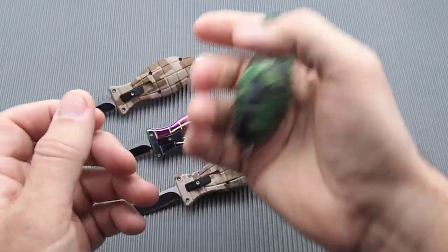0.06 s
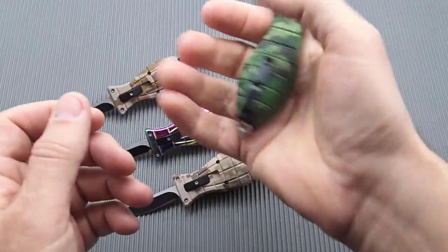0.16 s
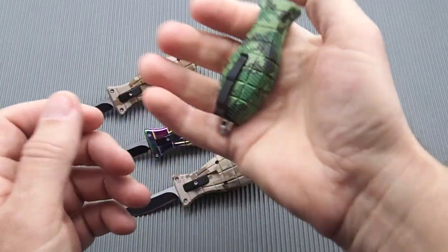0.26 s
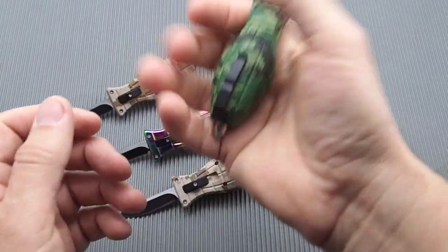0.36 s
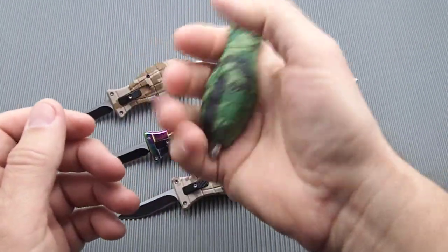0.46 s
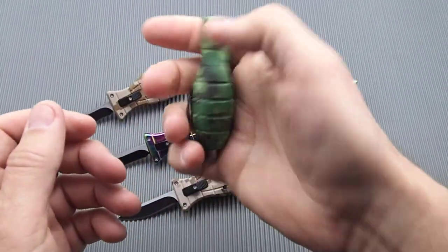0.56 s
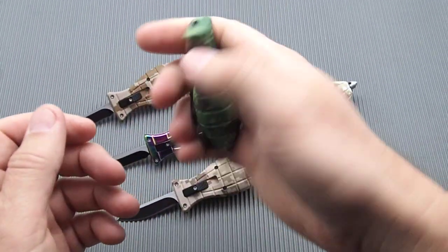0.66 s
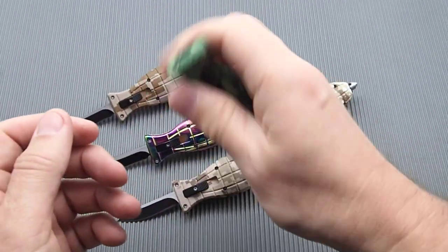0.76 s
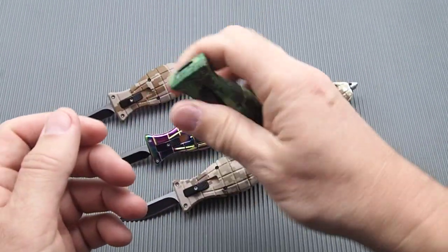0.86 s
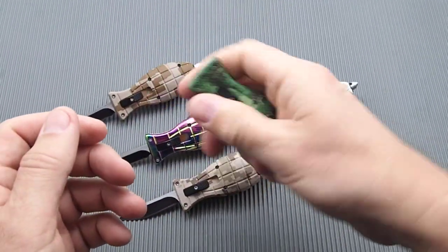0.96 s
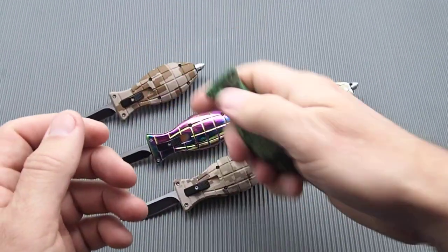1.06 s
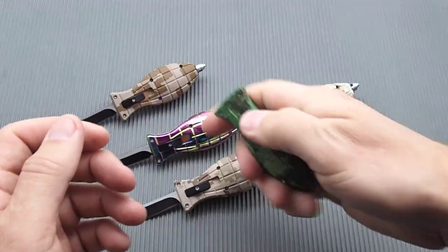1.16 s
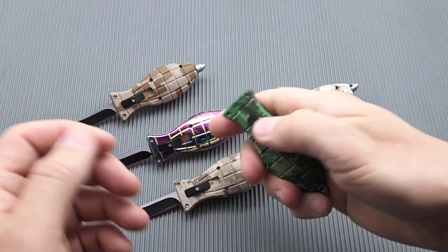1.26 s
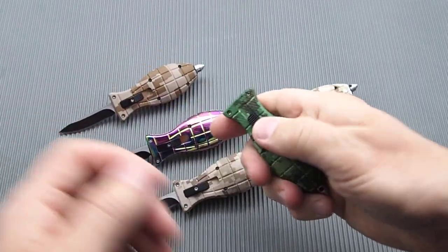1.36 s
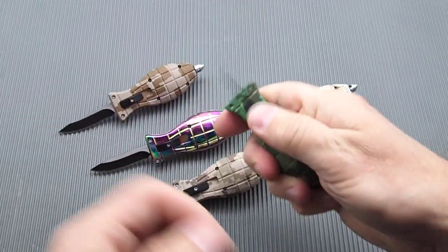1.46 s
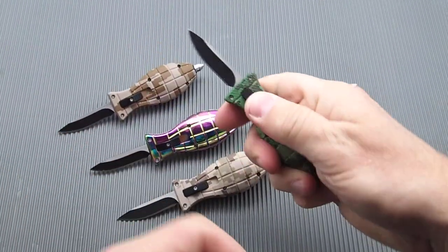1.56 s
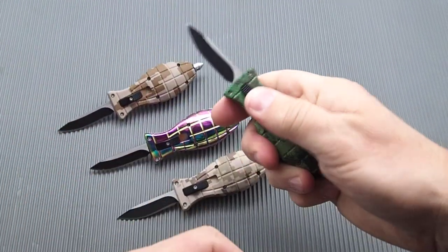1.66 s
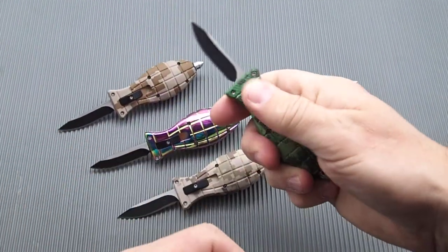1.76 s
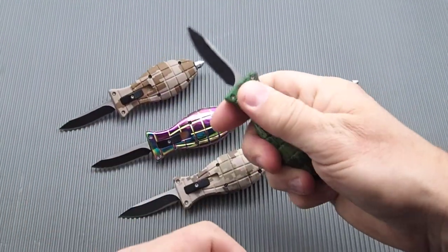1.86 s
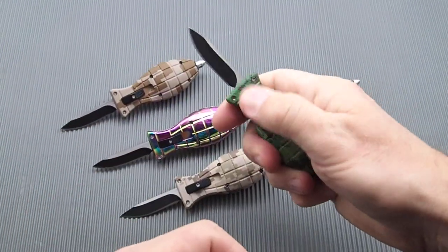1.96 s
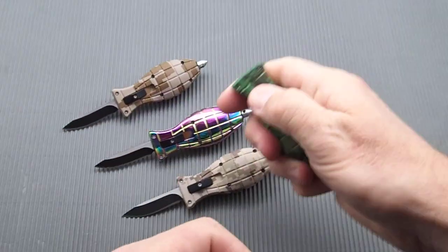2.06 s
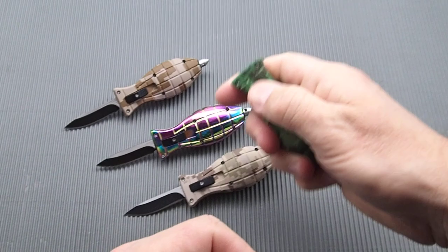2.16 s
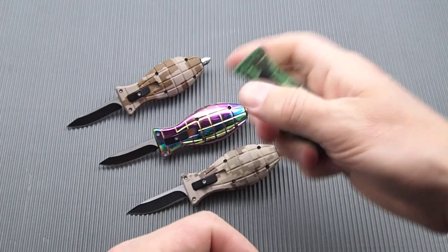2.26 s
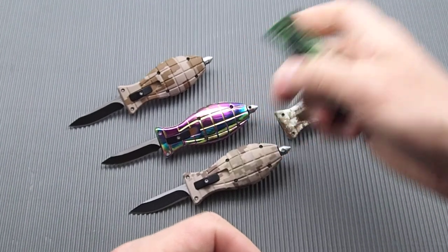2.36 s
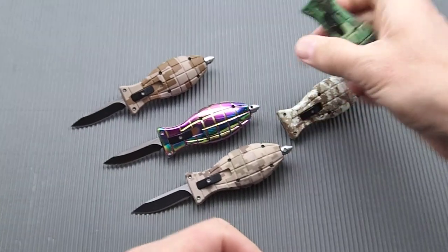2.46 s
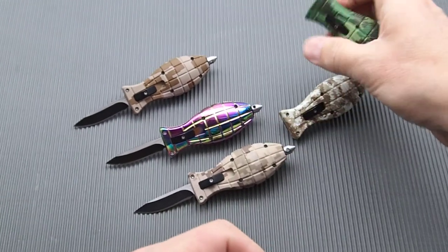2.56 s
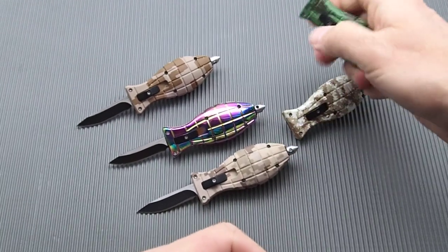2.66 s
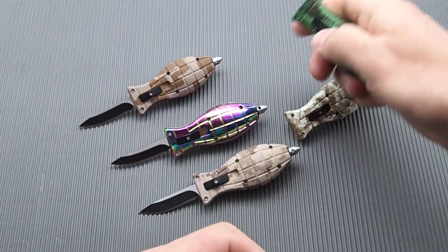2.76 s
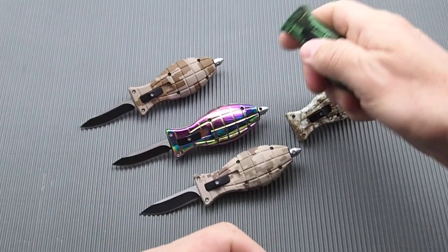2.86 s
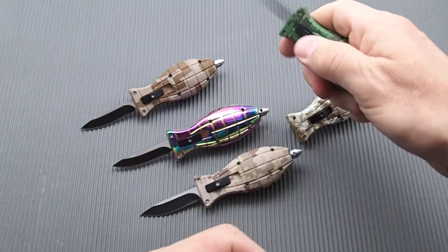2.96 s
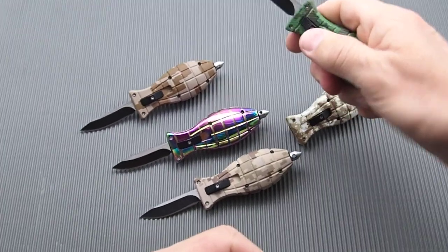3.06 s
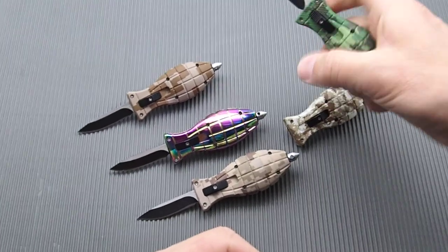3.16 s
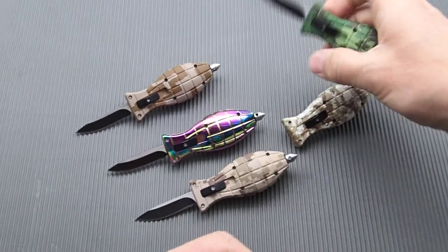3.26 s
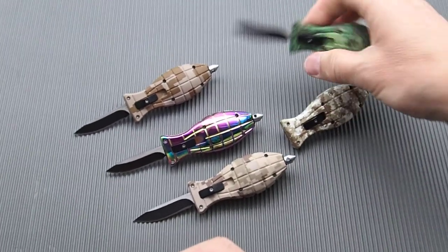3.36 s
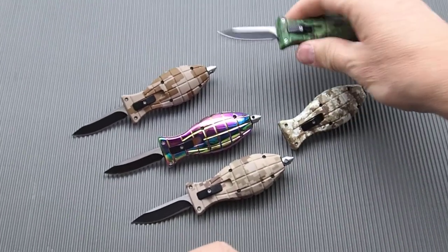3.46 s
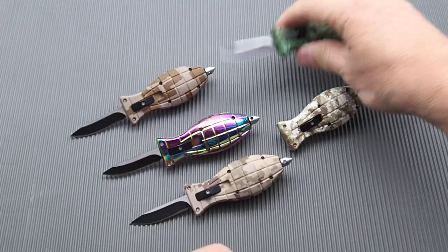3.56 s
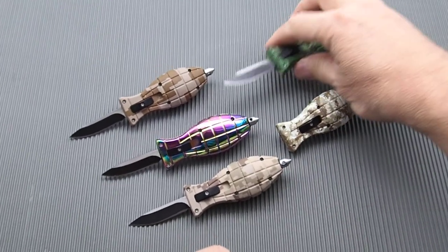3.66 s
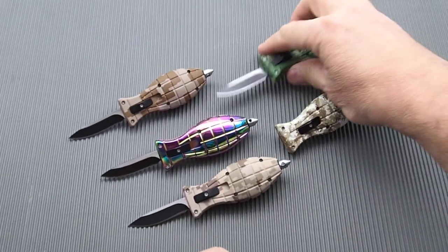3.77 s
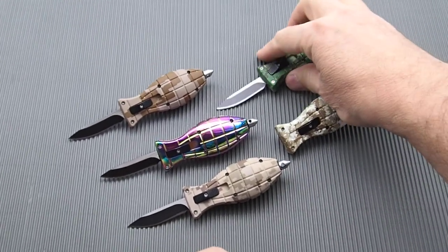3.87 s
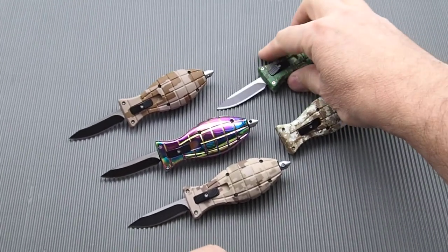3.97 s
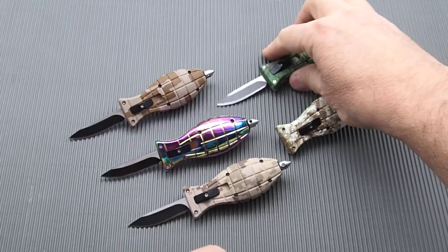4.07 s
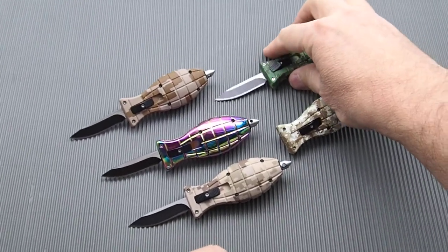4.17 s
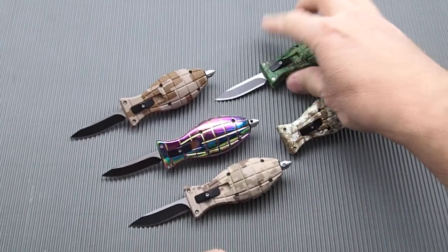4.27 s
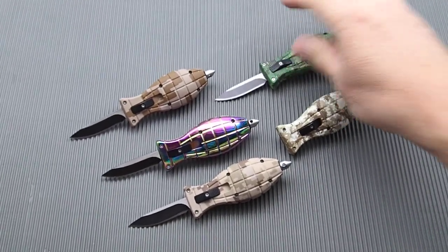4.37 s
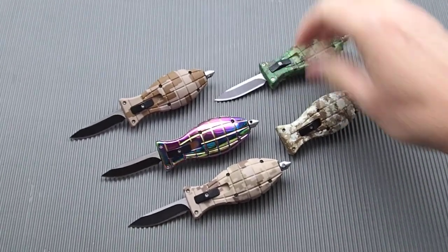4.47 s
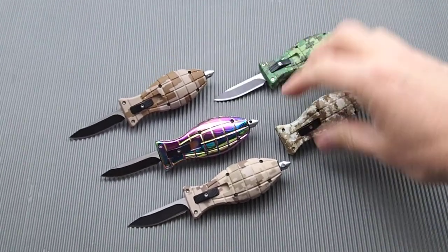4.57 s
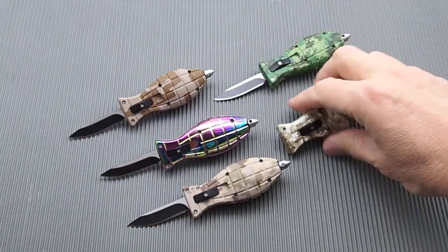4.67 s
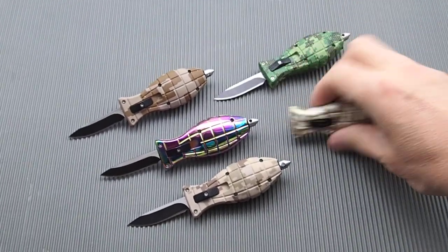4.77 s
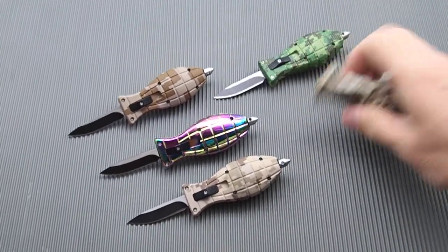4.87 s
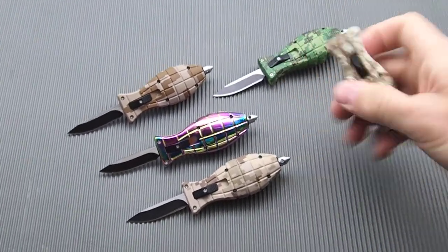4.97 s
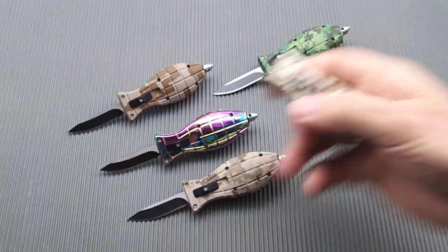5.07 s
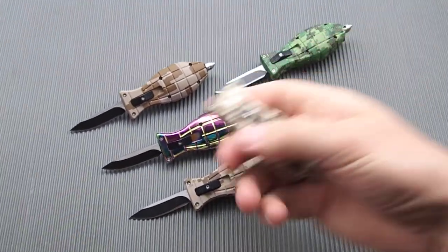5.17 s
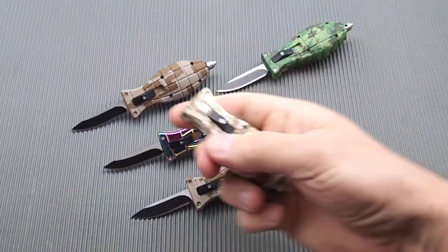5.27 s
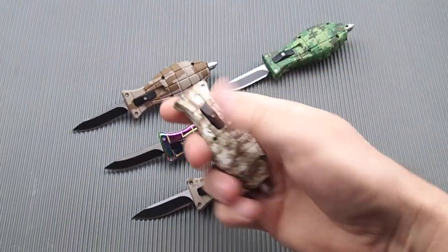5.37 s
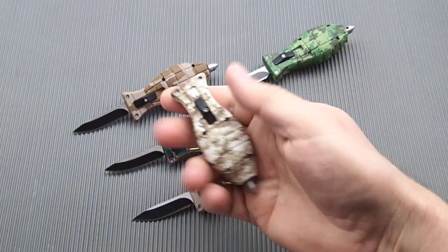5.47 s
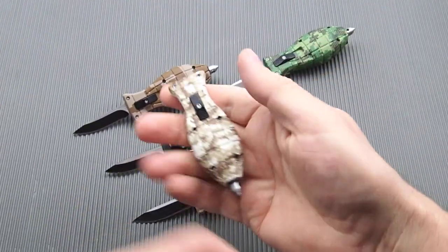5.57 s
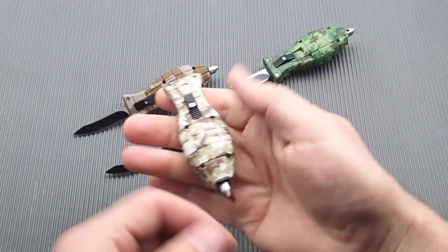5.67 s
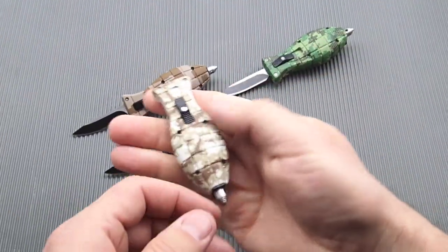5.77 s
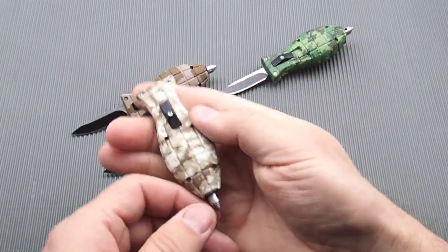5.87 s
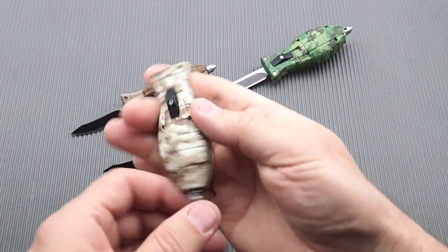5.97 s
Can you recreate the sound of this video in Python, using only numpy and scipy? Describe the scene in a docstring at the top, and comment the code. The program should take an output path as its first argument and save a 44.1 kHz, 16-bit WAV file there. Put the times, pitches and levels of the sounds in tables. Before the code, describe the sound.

Three bright steel blade snaps close up, soft skin rubbing, a knife set down and another scraped up, over hiss and a thin fluttering motor tone.

```python
"""Spring knife snapped close to a camera

In a room, close to the camera's two microphone ports, a knife is turned in the hand, snapped out, back and out,
laid on a ribbed rubber mat, and a second one is dragged up. Snaps and taps are noise bursts through steel and
handle spectra; the coil and the dull knocks are dying sines; strokes of the hand are grainy noise. The lens motor
whines in short tone bursts, one in most frames, over noise hiss; gain control ducks the sound after each snap."""
import sys
import numpy as np
from scipy import signal
from scipy.fft import rfft, irfft
from scipy.io import wavfile
from scipy.ndimage import uniform_filter1d

SR = 44100
rng = np.random.default_rng(int(sys.argv[2]) if len(sys.argv) > 2 else 0)


def digitize_waveform(pressure):
    """Quantize a signal to 16-bit integers and store it at the path in sys.argv[1].

    Rows of a 2-D input are taken as channels; values are limited to [-1, 1].
    """
    field = np.atleast_2d(pressure).T
    bounded = np.clip(field, -1, 1)
    quanta = np.round(bounded * 32767).astype(np.int16)
    wavfile.write(sys.argv[1], SR, quanta)


N = 265173


def gain_of(db):
    """Decibels to an amplitude factor."""
    return 10 ** (np.asarray(db) / 20)


def evened(x):
    """Scales to rms 1."""
    return x / np.sqrt(np.mean(x ** 2) + 1e-20)


def smooth_noise(shape, width):
    """Slow random wander of rms 1: white noise averaged over width samples along the last axis."""
    return evened(uniform_filter1d(rng.standard_normal(shape), size=width, axis=-1))


def read(points, hz):
    """Reads a table of points on a log-frequency axis."""
    f, value = np.transpose(points)
    return np.interp(np.log(hz + 1), np.log(f + 1), value)


def add(mix, start_s, sound):
    """Mixes a stereo sound in at its start time."""
    part = mix[:, round(start_s * SR):][:, :sound.shape[1]]
    part += sound[:, :part.shape[1]]


def causal(points, size=2048):
    """Minimum-phase response of a spectrum, scaled to energy 1."""
    hz = abs(np.fft.fftfreq(2 * size, 1 / SR))
    level_db = np.maximum(read(points, hz), -100)
    log_gain = np.log(gain_of(level_db))
    phase = -signal.hilbert(log_gain).imag
    taps = np.fft.ifft(np.exp(log_gain + 1j * phase)).real[:size]
    return taps / np.linalg.norm(taps)


def pair(same, size):
    """Two white noises, left and right, whose likeness follows frequency."""
    left, other = rfft(rng.standard_normal((2, size)))
    like = np.clip(read(same, np.fft.rfftfreq(size, 1 / SR)), -1, 1)
    right = like * left + np.sqrt(1 - like ** 2) * other
    return irfft(np.array([left, right]), size)


def coloured(x, points):
    """Filters by a spectrum and scales to rms 1."""
    return evened(signal.oaconvolve(x, causal(points)[None])[:, :x.shape[1]])


# Spectrum of the hiss at the ports: pitch_hz, level_db (relative, per Hz)
HISS_SPECTRUM = [(12, -47), (30, -9), (60, -6), (310, -2), (710, -2.5), (1550, -7.5), (2630, -20),
                 (3110, -16), (4000, -24), (5300, -6.5), (6800, -7.5), (7900, -4), (9240, -11.5),
                 (15700, -13)]
# Likeness of the hiss in the two ports: pitch_hz, likeness (0-1)
HISS_LIKENESS = [(60, 0.37), (400, 0.19), (1300, 0), (4400, 0.18), (15000, 0)]
# Lean of the hiss to the left port: pitch_hz, left_over_right_db
HISS_LEAN = [(60, 0.5), (240, 3.5), (950, 3.5), (3770, 3.5), (15000, 2)]
HISS_DB, HISS_TOP_HZ = -56, 15850


def room_hiss():
    """Steady room and preamplifier noise, little alike in the two ports."""
    hz = np.fft.rfftfreq(N, 1 / SR)
    lean_db = np.array([[.5], [-.5]]) * read(HISS_LEAN, hz)
    shape = gain_of(read(HISS_SPECTRUM, hz) + lean_db) * (hz < HISS_TOP_HZ)
    noise = irfft(rfft(pair(HISS_LIKENESS, N)) * shape, N)
    return gain_of(HISS_DB) * evened(noise)


# Frames in which the lens motor rests: frame (count from 0)
RESTING_FRAMES = [4, 7, 8, 11, 13, 20, 23, 32, 39, 40, 43, 49, 50, 53, 55, 60, 63, 74, 81, 86, 95, 98, 100,
                  105, 106, 109, 118, 131, 132, 139, 142, 149, 154, 157, 160, 163, 172, 175, 178]
FRAME_S, FIRST_S, LATE_S, BURST_S = 1001 / 30000, .0050, .0026, .0242
MOTOR_HZ, MOTOR_DB = 6170, -47.5


def lens_motor():
    """One burst of a steady tone in most frames, reaching the two ports out of phase."""
    out, t = np.zeros((2, N)), np.arange(0, BURST_S, 1 / SR)
    port_phase = np.array([[0], [2.55]])  # radians
    frames = np.arange(round(N / SR / FRAME_S))
    for frame in np.setdiff1d(frames, RESTING_FRAMES):
        turn = 2 * np.pi * (MOTOR_HZ * t + rng.random()) + port_phase
        burst = np.sin(turn) * signal.windows.tukey(len(t), .06)
        late = frame % 3 == 0  # in every third frame a burst starts late
        add(out, FIRST_S + frame * FRAME_S + LATE_S * late, burst)
    return out * gain_of(MOTOR_DB + np.array([[1.9], [-1.9]]))


# Spectrum of the rubbing hiss up close: pitch_hz, level_db (relative, per Hz)
RUB_SPECTRUM = [(1290, -36.5), (2200, -9), (2370, -29), (2990, -15), (3970, -19.5), (5480, 6.5), (6580, -3),
                (8030, -4.5), (8870, -15.5), (14100, -18.5), (16000, -30)]
# Spectrum of the low scrape under it: pitch_hz, level_db (relative, per Hz)
SCRAPE_SPECTRUM = [(59, -53), (100, -0.5), (765, -5), (895, -3), (1300, -1), (1850, -11.5), (3000, -14.5),
                   (3900, -32), (6600, -120)]
# Likeness in the two ports of noise made close by: pitch_hz, likeness (0-1)
NEAR_LIKENESS = [(100, 0.73), (2400, 1), (4400, 0.84), (8000, 0.37), (15000, 0.23)]
# Strokes of skin and handle: peak_s, rise_s, fall_s, hiss_db, scrape_db (against the hiss)
HAND_STROKES = [(.148, 0.2, 0.13, -48, -23), (.45, 0.4, 0.097, -56.5, -25), (.8, 0.27, 0.052, -65, -19),
                (.924, .02, 0.014, -60, -20), (1.48, 0.075, 0.065, -56.5, -21),
                (2.456, 0.13, 0.28, -61, -23), (3.17, 0.058, 0.039, -56, -23), (3.37, .07, .3, -61.5, -12),
                (3.76, 0.11, 0.018, -55.5, -15), (3.83, 0.059, 0.09, -63, -3),
                (4.054, 0.042, 0.084, -48, -12.5), (4.162, 0.0096, 0.013, -54, -8),
                (4.3, 0.039, 0.038, -59, -27), (4.46, 0.21, .12, -59, -14), (4.72, 0.056, 0.029, -42, -10),
                (4.747, 0.034, 0.029, -40, -13), (4.787, 0.029, 0.098, -45.5, -18.5),
                (4.87, 0.083, 0.032, -43.5, -20.5), (5.01, 0.12, 0.12, -63.5, -9),
                (5.174, .012, 0.2, -65, -25), (5.872, .025, 0.013, -67, -16)]
STROKE_EDGE_DB = -22.5  # level one rise before and one fall after the peak, against the peak
STROKE_ROUND = 1.17  # 1 = pointed peak, 2 = rounded
SHIFT_DB, SHIFT_SCRAPE_DB, SHIFT_FLICKER_DB = -71.5, -71, 2.5  # the grip shifts faintly throughout


def rubbing():
    """Stick and slip: noise with a fast, grainy flicker of level under the strokes of the hand."""
    peak_s, rise_s, fall_s, hiss_db, scrape_db = np.transpose(HAND_STROKES)[:, :, None]
    late_s = np.arange(0, N, 32) / SR - peak_s  # levels move every 32 samples
    from_peak = np.where(late_s < 0, -late_s / rise_s, late_s / fall_s)
    stroke_db = hiss_db + STROKE_EDGE_DB * from_peak ** STROKE_ROUND
    flicker_db = SHIFT_FLICKER_DB * smooth_noise(late_s.shape[1], 40)
    hiss_steps = gain_of(stroke_db).sum(0) + gain_of(SHIFT_DB + flicker_db)
    scrape_steps = gain_of(stroke_db + scrape_db).sum(0) + gain_of(SHIFT_SCRAPE_DB + flicker_db)
    hiss_level, scrape_level = np.repeat([hiss_steps, scrape_steps], 32, axis=1)[:, :N]
    grain = gain_of(2.4 * smooth_noise(N, 110))
    hiss = coloured(pair(NEAR_LIKENESS, N) * grain, RUB_SPECTRUM)
    scrape = coloured(pair(NEAR_LIKENESS, N) * grain, SCRAPE_SPECTRUM)
    return gain_of([[1.6], [-1.6]]) * (hiss_level * hiss + scrape_level * scrape)


# Snaps of the blade: strike_s, catch_before_strike_s, travel_s (strike to lock), chatter_after_strike_s,
# rebound_after_lock_s, catch_db, strike_db, chatter_db, lock_db, rebound_db,
# knock_db (handle), thud_db, lock_crack_db, lock_thud_db
BLADE_SNAPS = [(1.5078, .0031, .0165, .0032, .0065, -20, -13, -19, -13, -17, -18, -38, 5, -60),
               (2.0313, .0014, .0140, .0025, .0030, -15, -13, -21, -9.5, -19, -23, -28, 13, -42),
               (2.9986, .0022, .0158, .0060, .0076, -25, -13.5, -18.5, -11.5, -22, -19, -31, 12.5, -48)]
# Release, strike, chatter and rebound: hardness_db, knock_db and thud_db (added to the snap's own),
# crack_db, rattle_t60_s
SNAP_PARTS = [(0, -2, 2, 4, .05), (1, -10, 0, 13.5, .075), (0, -12, -10, 6, .11), (7, -3, -14, 4, .075)]
LOCK_HARD_DB, LOCK_T60_S = 9, 0.081


def snap_blows():
    """Spells each snap out as five blows: release, strike, chatter, rebound and the lock of the blade."""
    rows = []
    for (strike_s, lead_s, travel_s, chatter_s, rebound_s, catch_db, strike_db, chatter_db, lock_db,
         rebound_db, knock_db, thud_db, lock_crack_db, lock_thud_db) in BLADE_SNAPS:
        lock_s = strike_s + travel_s
        times_s = [strike_s - lead_s, strike_s, strike_s + chatter_s, lock_s + rebound_s]
        levels_db = [catch_db, strike_db, chatter_db, rebound_db]
        for start_s, level_db, part in zip(times_s, levels_db, SNAP_PARTS):
            hard_db, part_knock_db, part_thud_db, crack_db, t60_s = part
            rows.append((start_s, level_db, hard_db, knock_db + part_knock_db,
                         thud_db + part_thud_db, crack_db, t60_s))
        rows.append((lock_s, lock_db, LOCK_HARD_DB, knock_db, lock_thud_db, lock_crack_db, LOCK_T60_S))
    return rows


# Spectrum of the steel up close: pitch_hz, level_db (relative, per Hz)
STEEL_SPECTRUM = [(1760, -43.5), (3000, -24.5), (3460, -26), (3770, -10.5), (4110, -23), (4480, -6),
                  (4920, -4), (5750, 3), (6830, -7.5), (8060, -1.5), (11300, -20), (14500, -11.5),
                  (15600, -14), (16100, -51), (16600, -19)]
# Spectrum of the handle's knock: pitch_hz, level_db (relative, per Hz)
KNOCK_SPECTRUM = [(700, -30), (1200, -12.5), (1800, -12), (2400, 3), (2800, 0), (3200, 2.5), (3500, -18),
                  (4500, -57)]
# Spectrum of the low thud: pitch_hz, level_db (relative, per Hz)
THUD_SPECTRUM = [(35, -5), (60, -6), (315, -4.5), (502, 1), (839, 7), (1100, -7), (1630, 6.5), (1810, -23),
                 (2040, 3), (2200, -10), (2860, -115), (4840, -120)]
# How much of a blow's hardness tilts the steel: pitch_hz, share (0-1)
HARDNESS_SHARE = [(8000, 0), (12000, 1)]
# Small ticks of the slider and contacts with the mat: start_s, level_db (steel), hardness_db,
# knock_db and thud_db (against the steel), crack_db (against the rattle), rattle_t60_s
SMALL_TAPS = [(2.0009, -41.5, -2, -16, -19, 5, 0.06), (2.0276, -25.5, -7, -14, -32, -4, .06),
              (2.26, -48.5, -15, -35, -20, 6, 0.057), (2.7167, -52, -12, -25, -24, 4, 0.069),
              (2.84, -56, -10, -24, -10, -1, 0.082), (2.9049, -37, -10, -38, -28, 4, 0.053),
              (3.137, -54, -9, -8, -25, 4, 0.048), (3.1553, -48, 5, -37, -32, 5, .055),
              (3.349, -57, -7, -22, -2, -8, 0.11), (3.7054, -26, -8.5, -16.5, -28, 6.5, 0.065),
              (3.709, -29.5, -21, -39, -14, 19, 0.071), (3.8675, -23.5, -5.5, -28, -12.5, -22, 0.049),
              (3.8741, -34, -31, -34, -10, 5, 0.074), (3.8844, -38, -12, -17, -7, -12, 0.067),
              (4.1578, -46, -24, -31, -9, -4, 0.041), (4.29, -48.5, -12, -31, -21, -6, 0.056)]
BLOW_PAN_DB = 0.5  # left over right


def blows():
    """Each blow is a crack and a dying rattle of tiny contacts, heard through steel, handle and mat."""
    knock, thud = causal(KNOCK_SPECTRUM), causal(THUD_SPECTRUM)
    hz, steel_db = np.transpose(STEEL_SPECTRUM)
    out, t = np.zeros((2, N)), np.arange(6000) / SR
    for start_s, level_db, hard_db, knock_db, thud_db, crack_db, t60_s in snap_blows() + SMALL_TAPS:
        tilted_db = steel_db + hard_db * read(HARDNESS_SHARE, hz)  # a hard blow is brighter
        steel = causal(np.transpose([hz, tilted_db]))
        body = steel + gain_of(knock_db) * knock + gain_of(thud_db) * thud
        contacts = gain_of(2.9 * smooth_noise(len(t), 24))
        crack = gain_of(crack_db - 60 * t / .004)  # falls 60 dB in 4 ms
        rattle = contacts * gain_of(-60 * t / max(t60_s, .005))
        onset = 1 - np.exp(-t / 0.00017)
        drive = pair(NEAR_LIKENESS, len(t)) * (crack + rattle) * onset
        add(out, start_s, gain_of(level_db) * signal.fftconvolve(drive, body[None]))
    return out * gain_of(np.array([[.5], [-.5]]) * BLOW_PAN_DB)


# Multiples of the coil's pitch, lowest first: blade_in_db, blade_out_db, t60_s (before ring_share)
COIL_PARTIALS = [(-12, -12, 1.45), (-13, -5, .26), (-3, 8, .22), (6, -14, .12), (0, -1, .38),
                 (-4, -12, .15), (12, 20, .11), (2, 10, .13)]
# Plucks of the coil: start_s, level_db, blade_out (0 or 1), favoured_hz (by the contact),
# fall_off_db (per octave away from it), ring_share (times the partial's t60)
COIL_PLUCKS = [(1.525, -47, 1, 3000, 0, .93), (2.047, -51, 0, 3000, 0, 1.7), (3.015, -39, 1, 2400, 14, .55),
               (3.15, -58, 1, 2000, 36, 2.6)]
SPRING_HZ = 1050


def spring():
    """Dying partials of the plucked coil on whole multiples; each wavers as the coil touches its channel."""
    out, t = np.zeros((2, N)), np.arange(SR) / SR
    in_db, out_db, t60_s = np.transpose(COIL_PARTIALS)[:, :, None]
    hz = SPRING_HZ * np.arange(1, len(COIL_PARTIALS) + 1)[:, None]
    for start_s, pluck_db, blade_out, near_hz, fall_db, share in COIL_PLUCKS:
        waver_db = 2.5 * smooth_noise((len(COIL_PARTIALS), SR), 900)
        partial_db = out_db if blade_out else in_db
        level_db = pluck_db + partial_db - fall_db * abs(np.log2(hz / near_hz))
        level = gain_of(level_db - 60 * t / (share * t60_s) + waver_db)
        tones = np.sin(2 * np.pi * (hz * t + rng.random(hz.shape)))
        onset = 1 - np.exp(-t / 0.0034)
        add(out, start_s, (level * tones).sum(0) * onset * gain_of([[1.0], [-1.0]]))
    return out


# Modes of the handle in the hand or on the mat: pitch_hz, level_db (relative), t60_s (before ring_share)
HANDLE_MODES = [(161, -2.5, 0.12), (310, 1.5, 0.044), (610, -1, 0.039), (848, -2.5, 0.053), (990, -5, .05),
                (1230, -2.5, 0.019), (1620, -2, 0.028)]
# Dull knocks: start_s, level_db, favoured_hz (by the contact), fall_off_db (per octave away from it),
# ring_share (times the mode's t60)
DULL_KNOCKS = [(2.0298, -26, 130, 20, .2), (2.0434, -48, 130, 20, .22), (3, -57, 150, 20, .2),
               (3.349, -40.5, 990, 34, 1), (3.351, -44, 590, 22, 1.5), (3.704, -29.5, 1230, 28, 1.2),
               (3.703, -32, 310, 16, 0.32), (3.711, -34.5, 990, 20, 1.2), (3.868, -33, 820, 3.5, 1.2),
               (4.158, -49.5, 855, 4, 1.1), (4.747, -41, 272, 25, 1), (5.117, -35.5, 140, 20, 0.21)]


def thumps():
    """The handle's damped modes with a soft start, nearly alike in both ports; the deepest part is thinned."""
    out, t = np.zeros((2, N)), np.arange(8000) / SR
    hz, mode_db, t60_s = np.transpose(HANDLE_MODES)[:, :, None]
    for start_s, knock_db, near_hz, fall_db, share in DULL_KNOCKS:
        level_db = knock_db + mode_db - fall_db * abs(np.log2(hz / near_hz))
        level = gain_of(level_db - 60 * t / (share * t60_s))
        direction = rng.choice([-1, 1], hz.shape)  # each mode starts inward or outward
        swing = (level * np.sin(2 * np.pi * hz * t) * direction).sum(0)
        onset = 1 - np.exp(-t / 0.00012)
        add(out, start_s, swing * onset * gain_of([[.8], [-.8]]))
    low_cut_hz = 86.0
    return signal.lfilter(*signal.butter(1, low_cut_hz, "high", fs=SR), out)


def scene():
    """Room, motor, hands and knives together at the two ports."""
    return room_hiss() + lens_motor() + rubbing() + blows() + spring() + thumps()


THRESHOLD_DB, DUCK_SHARE, RECOVERY_DB_S = -22.5, 0.51, 28.2  # share: dB of ducking per dB over
EDGE_HZ = 16650


def record(dry):
    """Gain control ducks at a snap and recovers steadily; the peaks round off; then the band limit."""
    power = uniform_filter1d((dry ** 2).mean(0), size=300)
    power_db = 10 * np.log10(abs(power) + 1e-12)
    fall_db = np.arange(N) * RECOVERY_DB_S / SR
    wanted_db = DUCK_SHARE * (power_db - THRESHOLD_DB)
    # a running peak that sinks at the recovery rate
    duck_db = np.maximum(np.maximum.accumulate(wanted_db + fall_db) - fall_db, 0)
    ducked = dry / gain_of(signal.lfilter([.002], [1, -.998], duck_db))  # the gain lags by about 11 ms
    rounded = ducked / (1 + abs(ducked / 1.05) ** 6) ** (1 / 6)
    band_limit = signal.firwin(511, EDGE_HZ, window=("kaiser", 9), fs=SR)
    return signal.oaconvolve(rounded, band_limit[None], "same")


dry = scene()
out = record(dry)
digitize_waveform(out)
```